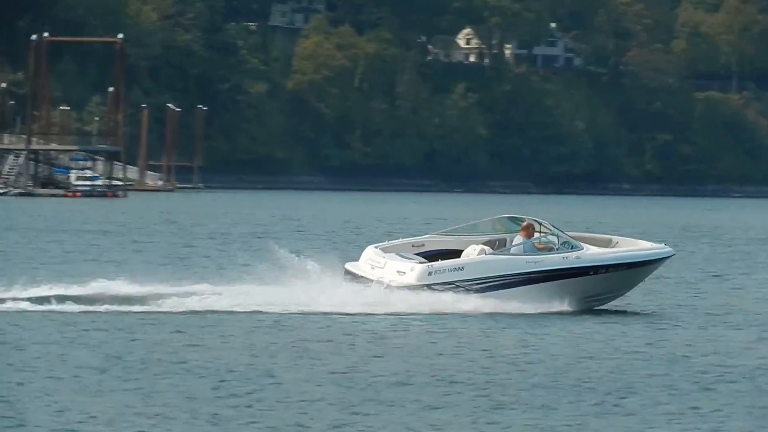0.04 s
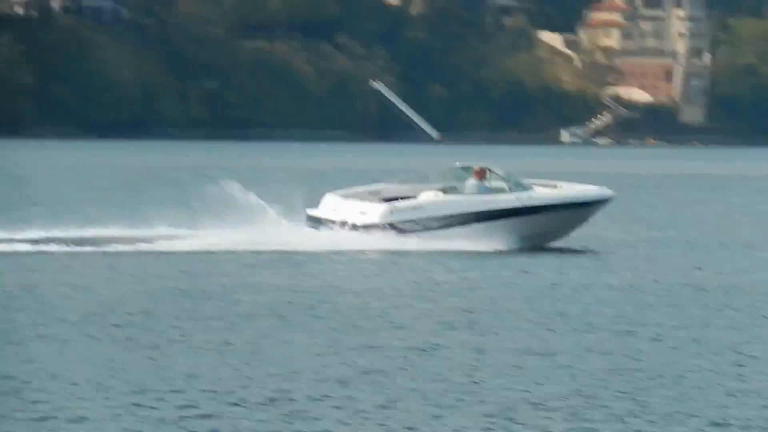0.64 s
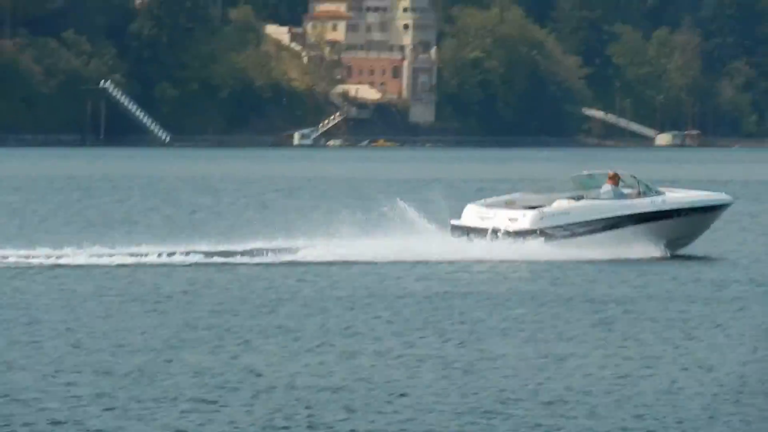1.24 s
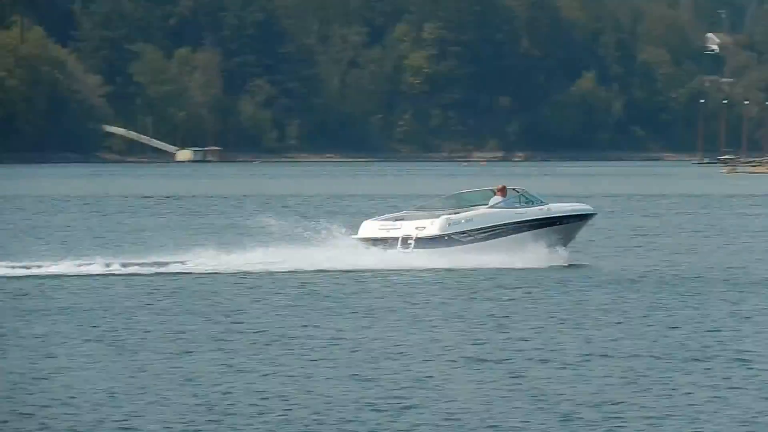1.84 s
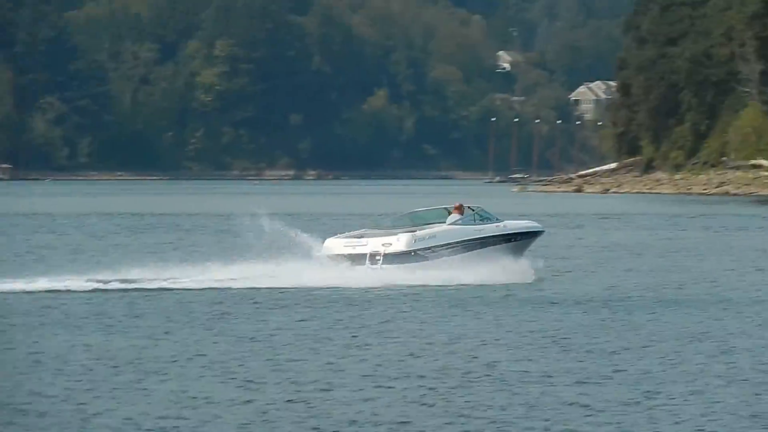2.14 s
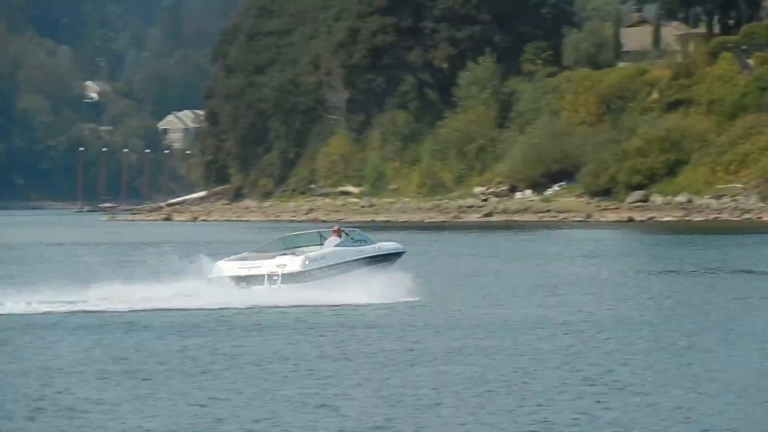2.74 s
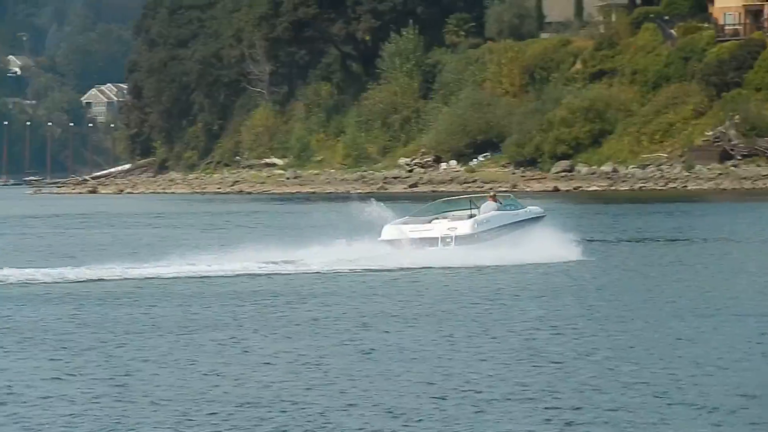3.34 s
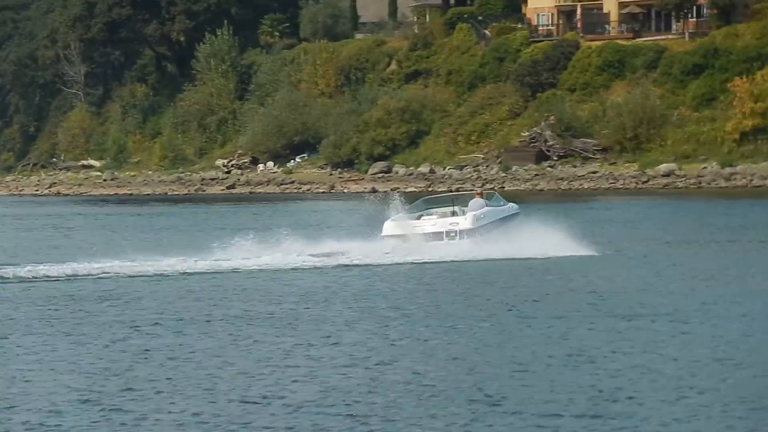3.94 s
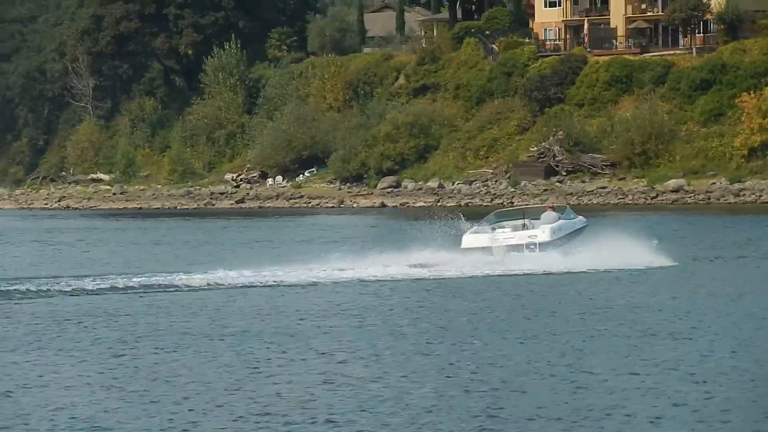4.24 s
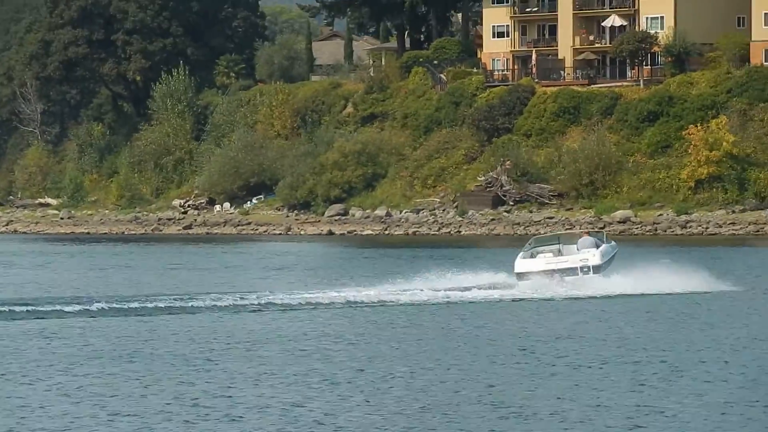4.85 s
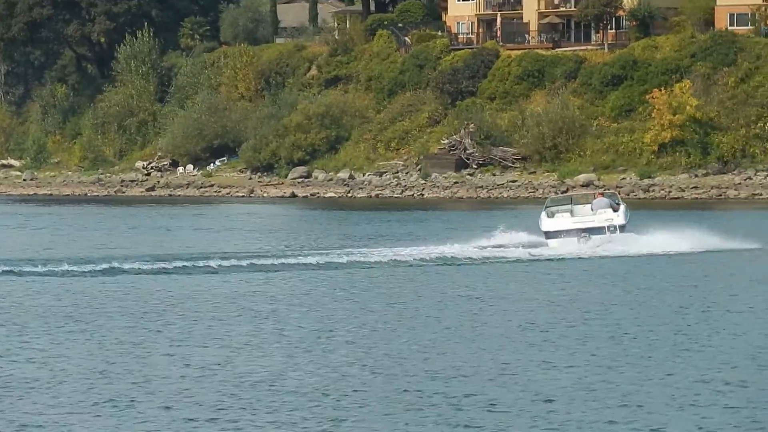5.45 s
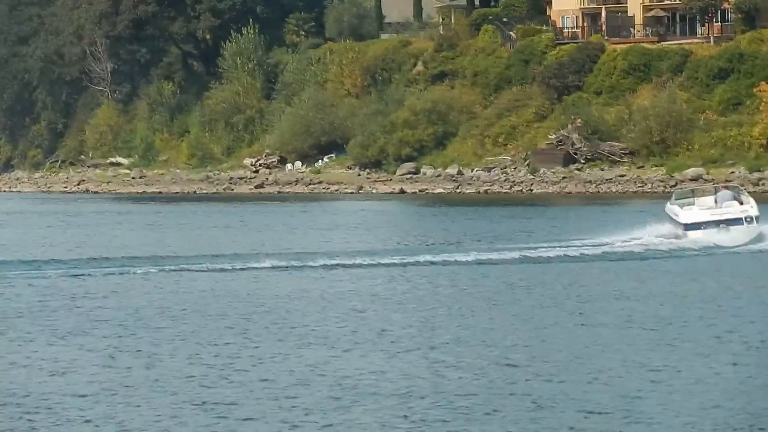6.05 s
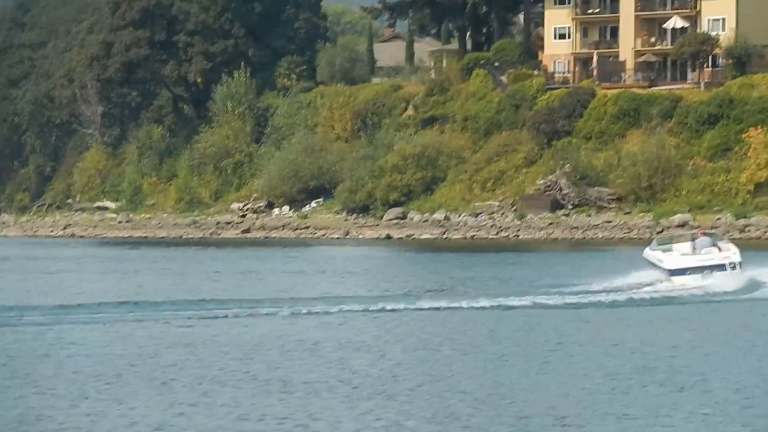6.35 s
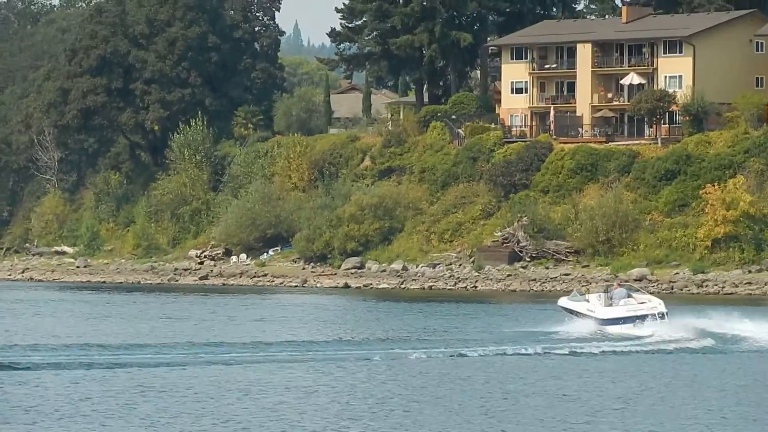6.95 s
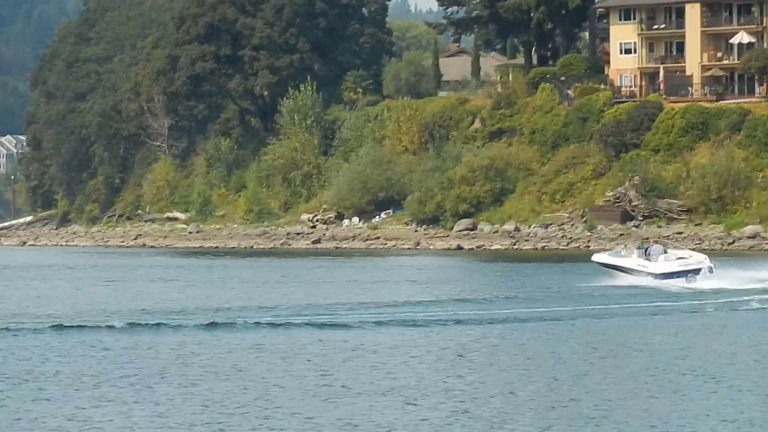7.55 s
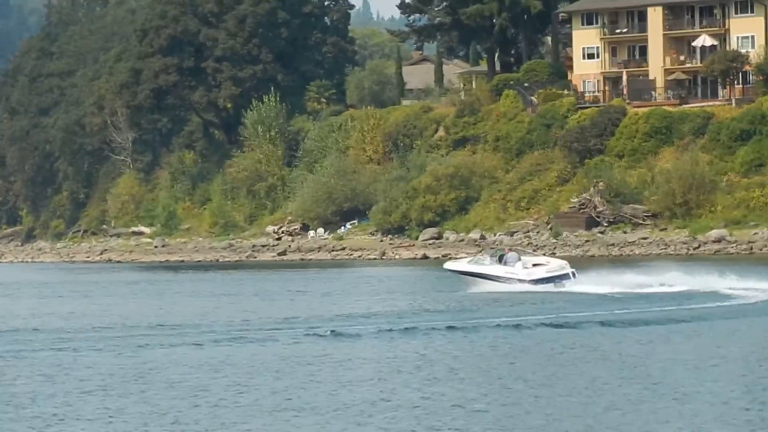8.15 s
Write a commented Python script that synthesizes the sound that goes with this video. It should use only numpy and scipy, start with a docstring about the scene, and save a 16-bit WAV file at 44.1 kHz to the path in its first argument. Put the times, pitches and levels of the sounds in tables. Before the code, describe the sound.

Outdoors by a lake, gusty wind rumbles and knocks against the microphone, the hardest thumps briefly pushing the whole sound down. Through it runs the even hum of a fast motorboat, with churning water and a faint hiss of spray. The engine note falls around the middle as the boat goes by, turns a little rougher, and rises slightly toward the end.

```python
"""A motorboat planes past on a lake and turns away. Its periodic firing drones as a harmonic series,
its meshing gears whine, and its wake, exhaust gas and spray add broadband noise.
Turbulent wind rumbles on the two microphone ports and buffets them, mostly the right one. Each hard
thump drives a limiter down, so that everything sags at once and creeps back.
Thin ticks are scattered left and right, and a far bird chirps once."""
import sys
import numpy as np
from scipy import signal
from scipy.fft import rfft, irfft, next_fast_len
from scipy.io import wavfile
from scipy.ndimage import uniform_filter1d, minimum_filter1d

SR = 44100
rng = np.random.default_rng(int(sys.argv[2]) if len(sys.argv) > 2 else 0)


def wav_record(signal):
    """Record a signal, one row per channel, as 16-bit PCM in the file named by sys.argv[1]."""
    frames = np.transpose(np.atleast_2d(signal))
    bounded = np.clip(frames, -1, 1)
    # unit amplitude maps onto the largest positive 16-bit level
    quanta = np.round(bounded * 32767).astype(np.int16)
    wavfile.write(sys.argv[1], SR, quanta)


N = 361179
TIME = np.arange(N) / SR


def undb(db):
    """The decibel scale: 20 dB is a factor of ten in amplitude."""
    return 10 ** (np.asarray(db) / 20)


def curves(table):
    """Linear interpolation of each column of a table against its first, time."""
    times, *columns = np.transpose(table)
    return [np.interp(TIME, times, column) for column in columns]


def unit(x):
    """Normalisation to rms 1."""
    return x / np.sqrt(np.mean(x ** 2))


def pan(db):
    """Amplitude panning: two gains of mean 1 for a balance, the left level minus the right."""
    gains = undb(np.array([[.5], [-.5]]) * db)
    return gains / gains.mean(axis=0)


def wander(rate_hz):
    """Low-pass noise: random steps smoothed into a fluctuation with a spread near 1."""
    hold = max(int(SR / rate_hz), 1)
    steps = np.repeat(rng.standard_normal(N // hold + 1), hold)
    return 1.3 * uniform_filter1d(uniform_filter1d(steps, hold), hold)[:N]


def colour(x, spectrum):
    """Spectral shaping by a curve of (f/Hz, level/dB) points, interpolated in log frequency."""
    hz, db = np.transpose(spectrum)
    n = next_fast_len(N)
    bins_hz = np.maximum(np.fft.rfftfreq(n, 1 / SR), 1)
    gain = undb(np.interp(np.log(bins_hz), np.log(hz), db))
    return irfft(rfft(x, n) * gain, n)[..., :N]


def noise(spectrum, correlation):
    """Partial coherence: shared and independent noise mix into a coloured stereo pair of rms 1."""
    common, own = rng.standard_normal(N), rng.standard_normal((2, N))
    return unit(colour(np.sqrt(correlation) * common + np.sqrt(1 - correlation) * own, spectrum))


def clicks(rows, spectrum):
    """Impulse responses of a spectrum, one for each row of (t/s, peak level/dB, balance/dB)."""
    impulses = np.zeros((2, N))
    for s, db, pan_db in rows:
        impulses[:, int(np.clip(s * SR, 0, N - 1))] += undb(db) * pan(pan_db)[:, 0]
    out = colour(impulses, spectrum)
    return out * impulses.max() / np.abs(out).max()


# The far bird's chirp: t/s, duration/s, starting f/Hz, final f/Hz, level/dB
BIRD_CHIRP = (4.075, .09, 3050, 3330, -50)
def bird(overtone_db=-4, quaver=0.013, rough_db=3):
    """Frequency modulation: a thin tone with two overtones quavers as it rises and levels off."""
    s, length_s, start_hz, end_hz, db = BIRD_CHIRP
    progress = np.clip((TIME - s) / length_s, 0, 1)
    glide_hz = end_hz - (end_hz - start_hz) * (1 - progress) ** 2
    phase = 2 * np.pi * np.cumsum(glide_hz * (1 + quaver * wander(250))) / SR
    tone = np.sin(phase) + undb(overtone_db) * (np.sin(2 * phase) + np.sin(3 * phase))
    return undb(db + rough_db * wander(200)) * np.sin(np.pi * progress) * tone


# The clearest ticks: t/s
TICK_TIMES = [1.095, 1.227, 1.809, 3.045, 3.355, 3.668, 4.567, 6.16, 6.301, 6.347, 6.434, 6.569, 7.101]
# Spectrum of a tick: f/Hz, level/dB
TICK_SPECTRUM = [(3000, -36.5), (4300, 2.5), (5500, 0.5), (7500, -9.5), (10000, -3.5), (12000, -18),
                 (15500, -21.5)]
def ticks(faint_count=60, clear_db=-29, faint_db=-35, spread_db=2, side_db=7):
    """Filtered impulses: thin ticks, a few clear and many faint, scattered left and right."""
    faint = [(rng.uniform(0, N / SR), faint_db + spread_db * rng.standard_normal())
             for _ in range(faint_count)]
    clear = [(s, clear_db) for s in TICK_TIMES]
    return clicks([(s, db, side_db * rng.standard_normal()) for s, db in clear + faint], TICK_SPECTRUM)


# Strength of the wind on the ports: t/s, level/dB
WIND_LEVEL = [(0, -17), (.27, -12.5), (.45, -15), (.8, -19.5), (.98, -12.5), (1.28, -13.5), (1.5, -18),
              (2.1, -6), (2.35, -12.5), (2.65, -17.5), (2.95, -14.5), (3.3, -13), (3.98, 1), (4.2, -16),
              (4.93, -8), (5.08, -23), (5.45, -11.5), (5.88, -20), (6.75, -9), (7.0, -11), (7.25, -6.5),
              (7.5, -13.5), (8.19, -5)]
# Spectrum of its rumble: f/Hz, level/dB
RUMBLE_SPECTRUM = [(15, -45.5), (30, -21), (55, -2), (90, 2.5), (140, -3.5), (220, -9), (300, -17),
                   (450, -28), (800, -44.5), (8000, -110)]
# Spectrum of air fluttering in a port, in eddies and buffets alike: f/Hz, level/dB
FLUTTER_SPECTRUM = [(80, -20), (200, 6.5), (330, 6), (550, -2.5), (800, -19), (1200, -29.5), (2000, -35.5),
                    (4000, -41.5), (10000, -100)]
def rumble(eddy_db=3, flutter_db=-22, flutter_spread_db=4.5):
    """Turbulence: each port has its own eddies, and the stronger break into a brighter flutter."""
    eddies = np.array([wander(28), wander(28)])
    low = noise(RUMBLE_SPECTRUM, correlation=0.022) * undb(eddy_db * eddies) * pan(db=-0.5)
    flutter = noise(FLUTTER_SPECTRUM, correlation=0) * undb(flutter_db + flutter_spread_db * eddies)
    return (low + flutter) * undb(curves(WIND_LEVEL)[0])


def light_blows(count=70, under_db=-12, side_db=-9, side_spread_db=9):
    """A random point process: rows of lesser blows whose strength follows the wind."""
    wind_db, = curves(WIND_LEVEL)
    return [(TIME[i], wind_db[i] + under_db, side_db + side_spread_db * rng.standard_normal())
            for i in rng.integers(0, N, count)]


# The strongest blows of wind, often in flurries: t/s, relative level/dB, balance/dB
STRONG_BLOWS = [(.215, -21, -24), (.228, -14, -27), (.247, -21.5, -9.5), (.283, -14, -20), (.298, -17, -20),
                (.313, -17, -14), (.558, -13, -10), (.998, -18.5, 0), (1.068, -23.5, -4.5), (1.25, -19, -9),
                (1.293, -22, -6), (1.314, -10, -11), (1.457, -19.5, -12), (1.655, -8, -32),
                (1.667, -10, -20), (1.683, -11.5, -28), (1.702, -17.5, -23), (1.726, -18.5, -17),
                (1.746, -7.5, -19), (1.812, -8, -1.5), (1.904, -17.5, -10), (1.942, -9.5, -16),
                (1.998, -10.5, -16.5), (2.054, -10, -20), (2.075, -14, -21), (2.166, -11, -22),
                (2.252, -13, -13.5), (2.366, -14, -19.5), (2.475, -10.5, -30), (2.535, -13.5, -17),
                (3.03, -16.5, 4.5), (3.065, -18.5, -4), (3.093, -10, -12), (3.222, -19, -3),
                (3.49, -15, -6), (3.687, -6, -21), (3.706, -3.5, -17), (3.73, -10.5, -12),
                (3.779, -13.5, 2.5), (3.833, -3.5, -23), (3.865, -7.5, -11.5), (3.94, -12, -7),
                (3.994, -4, -8), (4.031, -5.5, -11.5), (4.549, -14, -21.5), (4.8, -9.5, -18.5),
                (6.191, -12, -10.5), (6.346, -16.5, -2.5), (6.74, -12.5, -5.5), (6.812, -11.5, -5.5),
                (7.0, -11.5, -20.5), (7.119, -11.5, -4.5), (7.281, -12, 17), (7.57, -13.5, 5.5),
                (7.628, -13.5, 15), (7.821, -15.5, 3), (7.972, -11.5, .5), (8.097, -10, -0.5),
                (8.146, -5, 8.5), (8.178, -9, -2)]
# Spectrum of the swirl behind a blow: f/Hz, level/dB
SWIRL_SPECTRUM = [(80, -19), (220, 1.5), (330, -6.5), (500, -5), (900, -29.5), (6000, -90)]
BLOW_DECAY_S = .0095
def buffets(gain_db=-1, rise_s=.011, ragged_db=1.76, swirl_db=-4, swirl_s=0.018, dull_hz=1200):
    """Transient turbulence: a blow builds in a port, flutters and decays; a duller swirl trails it."""
    force = np.zeros((2, N))
    for s, db, pan_db in list(STRONG_BLOWS) + light_blows():
        blowing = (TIME > s - rise_s) & (TIME < s + .2)
        age = TIME[blowing] - s
        envelope = np.minimum((1 + age / rise_s) ** 2, np.exp(-age / BLOW_DECAY_S))
        force[:, blowing] += pan(pan_db) * undb(db) * envelope
    # soft clipping of the flutter inside each blow gives every blow a dense, even body
    air = np.tanh(noise(FLUTTER_SPECTRUM, correlation=0))
    air = signal.sosfilt(signal.butter(2, dull_hz, fs=SR, output="sos"), air)
    pole = np.exp(-1 / (swirl_s * SR))
    lagging_force = signal.lfilter([1 - pole], [1, -pole], force)
    swirl = lagging_force * noise(SWIRL_SPECTRUM, correlation=0) * undb(swirl_db)
    body = force * unit(air) * undb(ragged_db * wander(160))
    return undb(gain_db) * (body + swirl)


def knocks(count=3, knock_db=-1.9, after_db=-6.5, pitch_hz=570, pitch_spread=0.17, ring_s=0.00064):
    """Wave packets: air knocks in the port as each strong blow strikes, then again as it dies away."""
    out = np.zeros((2, N))
    for s, db, pan_db in STRONG_BLOWS:
        for k in range(count):
            delay = BLOW_DECAY_S * rng.uniform(.3, 2) if k else 0
            hz = pitch_hz * np.exp(pitch_spread * rng.standard_normal())
            near = slice(*np.searchsorted(TIME, [s + delay - .01, s + delay + .01]))
            t = TIME[near] - s - delay
            size = undb(db + knock_db + (after_db if k else 0)) * np.exp(-delay / BLOW_DECAY_S / 2)
            packet = np.sin(2 * np.pi * hz * t + rng.uniform(0, 2 * np.pi)) / np.cosh(t / ring_s)
            out[:, near] += pan(pan_db) * size * packet
    return out


# Hard thumps of air in a port: t/s, peak level of swing/dB, peak level of pop/dB, balance/dB
AIR_THUMPS = [(.336, 7, -8.5, -11.5), (1.326, -4, -16, -9), (1.957, 1.5, -5.5, -21), (2.38, 7, -14.5, -12),
              (3.095, -2.5, -27.5, -6), (3.43, 2, -15.5, 11), (3.617, -10, -16.5, -7),
              (3.689, 2.5, -9, -19), (3.854, 12, -5.5, -16), (3.996, 0.5, -18, -7),
              (4.803, 0, -15.5, -18.5), (5.714, -0.5, -20.5, -20.5), (6.379, 0, -27.5, 2.5),
              (6.667, 0, -18.5, 16.5), (6.756, -1, -16, -12.5), (7.009, 0.5, -26, -8.5),
              (7.243, 2.5, -19, 11), (7.632, 5.5, -19, 3), (8.013, 2, -14, 4.5)]
# Spectrum of the pop: f/Hz, level/dB
POP_SPECTRUM = [(150, -13.5), (500, 2), (1500, -1), (2600, -12.5), (4000, -27), (9000, -67.5)]
def thumps(swing_hz=105):
    """A bipolar pressure pulse: air slams into a port in one big swing, with a pop at its middle."""
    out = clicks([(s, pop_db, pan_db) for s, _, pop_db, pan_db in AIR_THUMPS], POP_SPECTRUM)
    for s, db, _, pan_db in AIR_THUMPS:
        near = np.abs(TIME - s) < 1 / swing_hz
        angle = 2 * np.pi * swing_hz * (TIME[near] - s)
        out[:, near] += pan(pan_db) * undb(db) * angle * np.exp((1 - angle ** 2) / 2)
    return out


# Fine spray thrown by the hull: t/s, level/dB
SPRAY_LEVEL = [(0, -69.5), (.5, -58), (.7, -64.5), (.95, -58.5), (1.55, -66), (2.1, -67), (2.55, -68),
               (2.9, -60), (3.15, -65), (3.45, -61), (4.3, -63), (5.1, -64), (5.6, -61), (5.8, -58),
               (6.2, -63), (6.5, -60.5), (7.15, -63.5), (7.38, -54.5), (7.68, -68), (7.88, -56.5),
               (8.05, -64.5)]
# Spectrum of its hiss: f/Hz, level/dB
SPRAY_SPECTRUM = [(2500, -26), (4500, -0.5), (6000, -0.5), (7500, -3), (9700, -1.5), (11500, -8.5),
                  (15500, -19)]
def spray(splutter_db=0.5, fizz_db=4):
    """Random amplitude modulation: the hiss of spray splutters slowly and fizzes fast."""
    hiss = noise(SPRAY_SPECTRUM, correlation=0)
    return hiss * undb(curves(SPRAY_LEVEL)[0] + splutter_db * wander(9.6) + fizz_db * wander(60))


# Rush of the wake, a little louder and softer by turns: t/s, level/dB
WAKE_LEVEL = [(0, -31), (.25, -33), (.45, -28.5), (.7, -32.5), (.78, -27.5), (.95, -30), (1.1, -28),
              (1.3, -31), (1.42, -34), (1.62, -33), (1.85, -29.5), (2.35, -31.5), (2.7, -32), (3.0, -30),
              (3.2, -32), (3.6, -33), (3.9, -31.5), (4.2, -31.5), (4.7, -31.5), (5.35, -30.5), (5.52, -34),
              (6.3, -31), (6.65, -34.5), (7.1, -31), (7.4, -31), (7.58, -29.5), (7.75, -32), (8.19, -31.5)]
# Spectrum of churned water: f/Hz, level/dB
WAKE_SPECTRUM = [(100, 1.5), (250, 1), (450, -4.5), (800, -8.5), (1100, -12.5), (1500, -14.5), (2000, -19),
                 (3100, -25), (4000, -32.5), (5000, -40.5), (8000, -61.5), (15000, -88)]
def wake(churn_db=1.5):
    """Broadband flow noise: the water churns steadily behind the hull."""
    rush = noise(WAKE_SPECTRUM, correlation=0.72)
    return rush * undb(curves(WAKE_LEVEL)[0] + churn_db * wander(35)) * pan(db=-1)


# Gear whine, singing out as the stern turns towards the shore: t/s, level/dB
WHINE_LEVEL = [(4.1, -67.5), (4.8, -54.5), (5.8, -59), (6.6, -69.5), (7.05, -56), (7.38, -50), (7.52, -46),
               (7.72, -50.5), (7.95, -52), (8.19, -71)]
def gears(phase, order=14, flutter_db=4, wobble_rad=0.75):
    """Gear meshing: the teeth make a tone locked to a multiple of the firing rate."""
    tone = np.sqrt(2) * np.sin(order * phase + wobble_rad * wander(25))
    return tone * undb(curves(WHINE_LEVEL)[0] + flutter_db * wander(16))


# Hoarse exhaust gas, heard from astern: t/s, level/dB
GAS_LEVEL = [(0, -37), (1.5, -43.5), (3, -41.5), (4.3, -33.5), (6.3, -34.5), (7.1, -42.5), (8.19, -36.5)]
# Spectrum of the gas: f/Hz, level/dB
GAS_SPECTRUM = [(200, -23), (450, 1.5), (620, -2), (780, 0.5), (930, -10), (1080, -4), (1400, -19.5),
                (3000, -41.5), (12000, -89.5)]
def exhaust_gas(phase, throb=0.22):
    """Periodic amplitude modulation: gas puffs through the wake at each firing."""
    puffs = 1 + throb * np.cos(phase)
    return noise(GAS_SPECTRUM, correlation=.8) * puffs * undb(curves(GAS_LEVEL)[0]) * pan(db=-3.5)


# The firing tone, swelling and fading over the water: t/s, level/dB
FUNDAMENTAL_LEVEL = [(0, -17), (.45, -13), (.62, -15.5), (.85, -9), (1.0, -14), (1.15, -11), (1.6, -13),
                     (1.95, -10.5), (2.35, -9), (2.5, -11.5), (3.0, -9), (3.2, -11.5), (3.32, -6.5),
                     (3.48, -14.5), (3.62, -9), (3.95, -12), (4.12, -4.5), (4.3, -8), (4.65, -10.5),
                     (4.85, -11), (5.05, -5.5), (5.38, -9.5), (5.52, -16.5), (5.7, -12.5), (6.3, -7.5),
                     (6.6, -12.5), (6.9, -12), (7.35, -11), (7.55, -11), (7.72, -15.5), (8.19, -10.5)]
# Harmonics as the stern turns towards the listener: t/s, 2nd level/dB, 3rd level/dB, 4th level/dB
HARMONIC_LEVELS = [(0, -29, -30.5, -50), (.6, -38.5, -32, -41), (1.1, -35, -32, -41), (1.3, -39, -40, -52),
                   (2.3, -31.5, -46, -58), (3.3, -38, -40, -53), (4.8, -33, -40, -47),
                   (6.1, -25, -36, -40.5), (6.9, -24.5, -38.5, -43.5), (7.5, -23.5, -37, -43),
                   (7.75, -42.5, -34, -46), (8.19, -26.5, -37.5, -50.5)]
# Weak lines from unequal cylinders: f/firing rate, level/dB
UNEVEN_ORDERS = [(.75, -32), (1.25, -43), (1.5, -40), (2.5, -52.5), (3.5, -52), (5, -52.5)]
def exhaust_drone(phase, waver_db=1, fade_db=1.5, blur_rad=0.33, uneven_fade_db=2.5, uneven_rad=0.76):
    """A harmonic series: a strong firing tone and weaker orders, each fading its own way over water."""
    def partial(order, db, jitter_rad):
        angle = order * phase + jitter_rad * wander(15) + rng.uniform(0, 2 * np.pi)
        return np.sqrt(2) * undb(db) * np.sin(angle)
    fundamental = partial(1, curves(FUNDAMENTAL_LEVEL)[0] + waver_db * wander(20), jitter_rad=0.036)
    harmonics = sum(partial(order, db + fade_db * wander(9), blur_rad)
                    for order, db in enumerate(curves(HARMONIC_LEVELS), 2))
    # the cylinder pattern repeats every four firings, so its lines lie on quarter orders
    uneven = sum(partial(order, db + uneven_fade_db * wander(9), uneven_rad)
                 for order, db in UNEVEN_ORDERS)
    return fundamental * pan(db=-0.6) + harmonics + uneven * pan(db=-2)


# Firing rate as heard, falling as the boat passes: t/s, f/Hz
FIRING_RATE = [(0, 178), (.55, 177), (1, 178.3), (1.5, 181.5), (2.5, 183.3), (2.8, 177.5), (3.1, 167.5),
               (3.5, 161.5), (4, 155.3), (4.6, 151.7), (5.1, 152), (5.6, 153.3), (6, 159.5), (6.5, 162.3),
               (7, 163.5), (7.5, 163.7), (8.19, 162)]
def motorboat():
    """Phase locking: one firing cycle drives drone, gears and gas, amid the noise of wake and spray."""
    phase = 2 * np.pi * np.cumsum(curves(FIRING_RATE)[0]) / SR
    return exhaust_drone(phase) + gears(phase) + wake() + exhaust_gas(phase) + spray()


def scene():
    """Superposition: the boat, the wind at the microphone, the ticks and the bird add linearly."""
    return motorboat() + rumble() + buffets() + thumps() + ticks() + bird() + knocks()


def limiter(x, ceiling_db=-2.5, attack_s=0.014, recovery_db_per_s=20, initial_duck_db=11):
    """Peak limiting: both channels duck just ahead of a peak over the ceiling, then climb steadily."""
    over_db = np.maximum(20 * np.log10(np.abs(x).max(axis=0)) - ceiling_db, 0)
    recovered_db = recovery_db_per_s * TIME
    # earlier wind has left the gain held down at the start
    duck_db = np.maximum.accumulate(np.maximum(over_db + recovered_db, initial_duck_db)) - recovered_db
    window = int(attack_s * SR)
    return x * undb(uniform_filter1d(minimum_filter1d(-duck_db, window), window))


def record(dry, low_cut_hz=37, top_hz=15800):
    """Band and peak limiting: the deepest bass is thinned, the peaks held down and the top cut."""
    thinned = signal.sosfilt(signal.butter(2, low_cut_hz, "high", fs=SR, output="sos"), dry)
    return signal.sosfilt(signal.ellip(8, .2, 70, top_hz, fs=SR, output="sos"), limiter(thinned))


dry = scene()
out = record(dry)
wav_record(out)
```